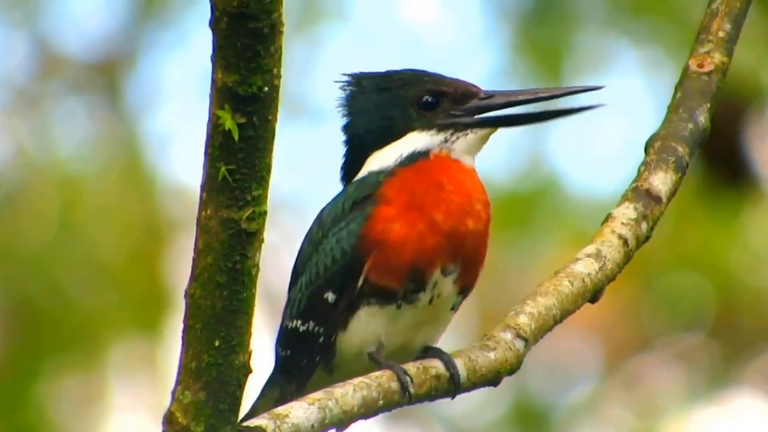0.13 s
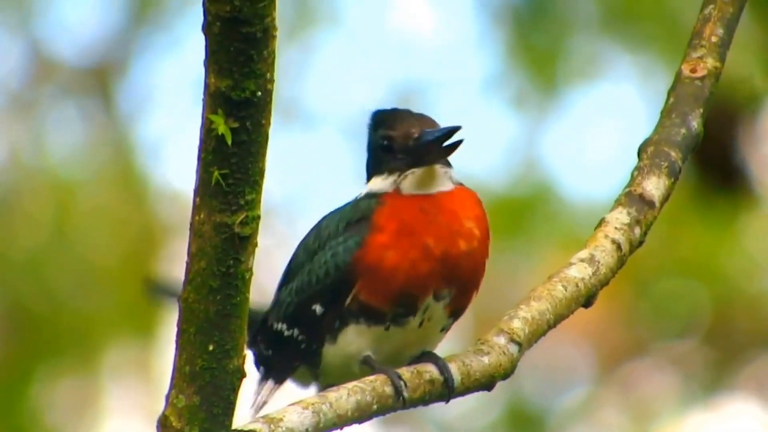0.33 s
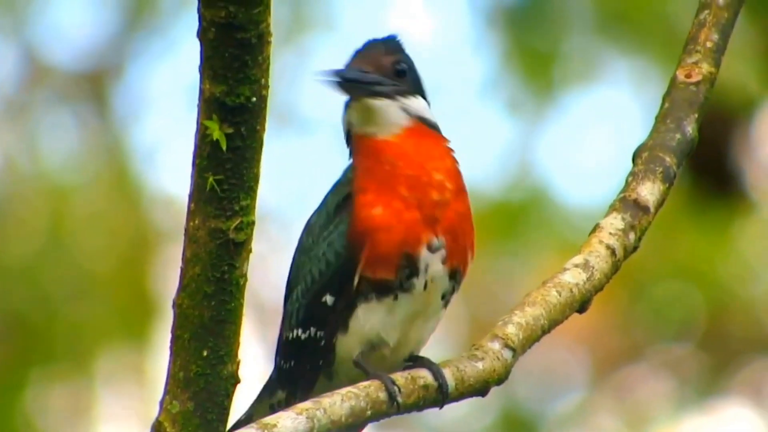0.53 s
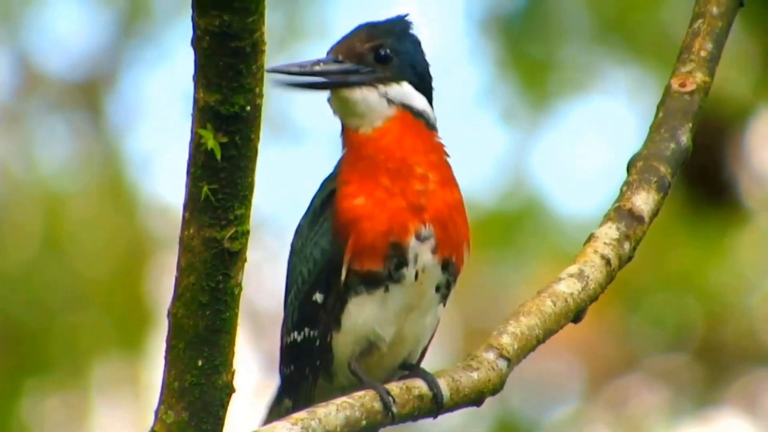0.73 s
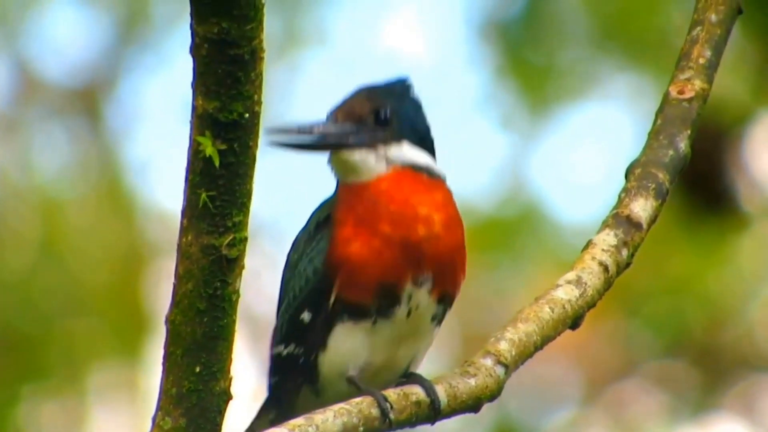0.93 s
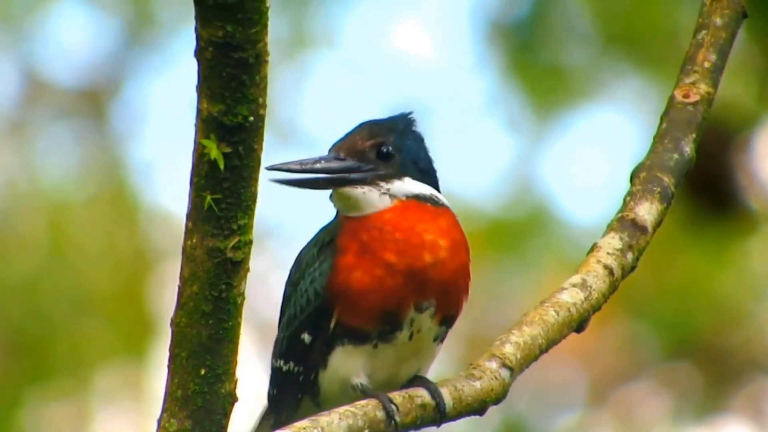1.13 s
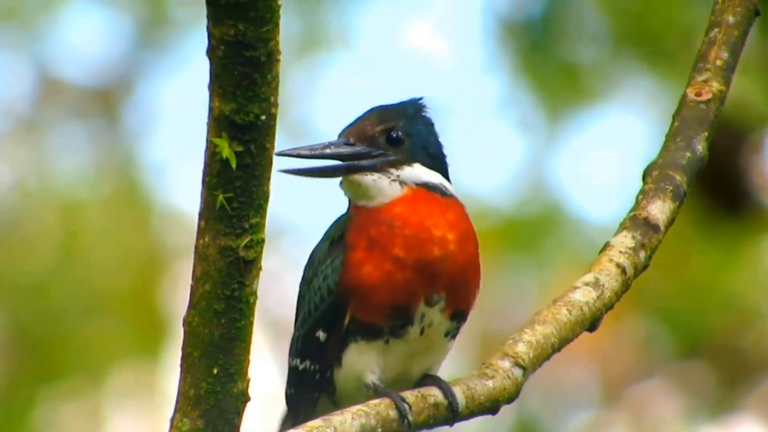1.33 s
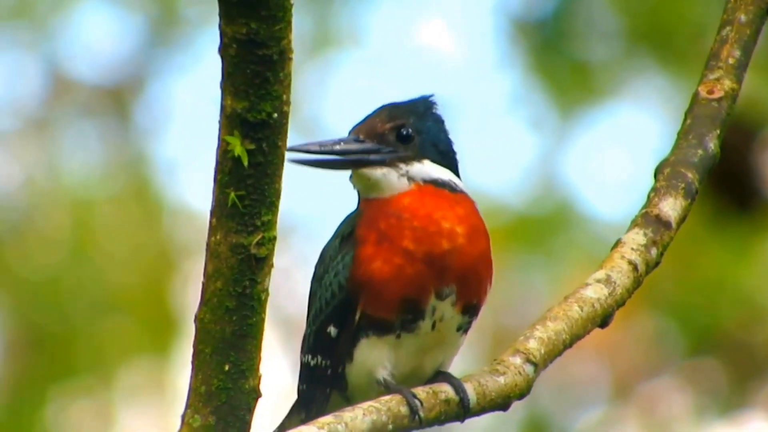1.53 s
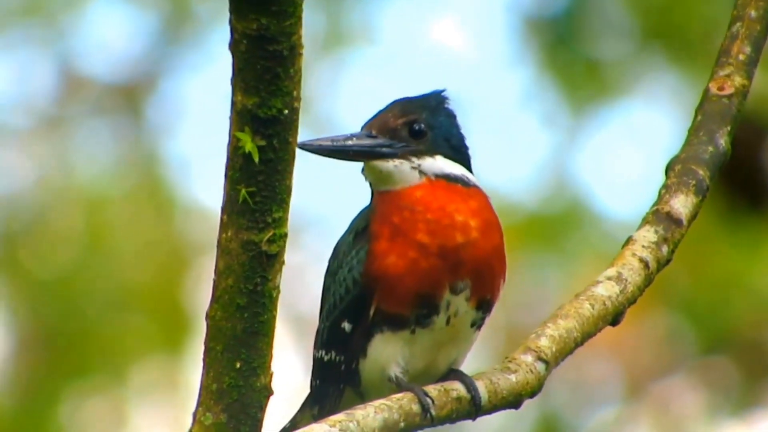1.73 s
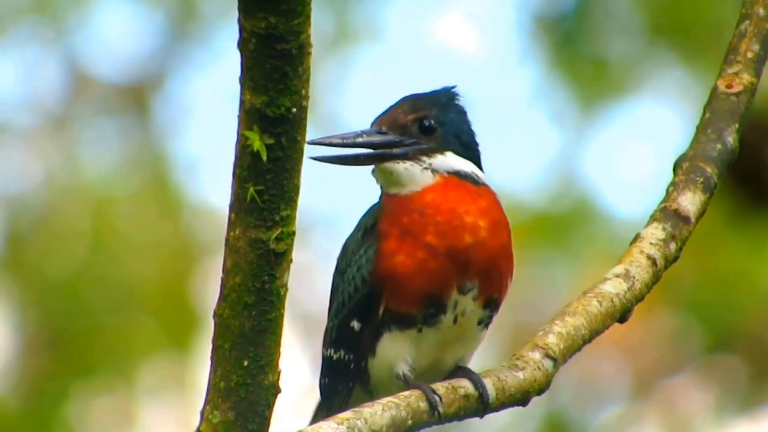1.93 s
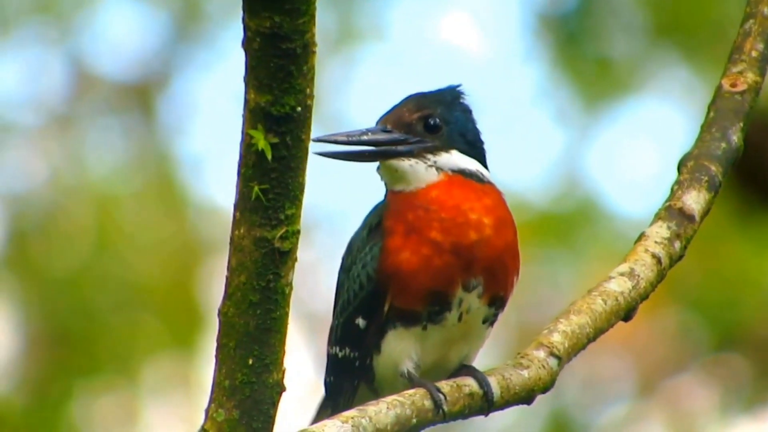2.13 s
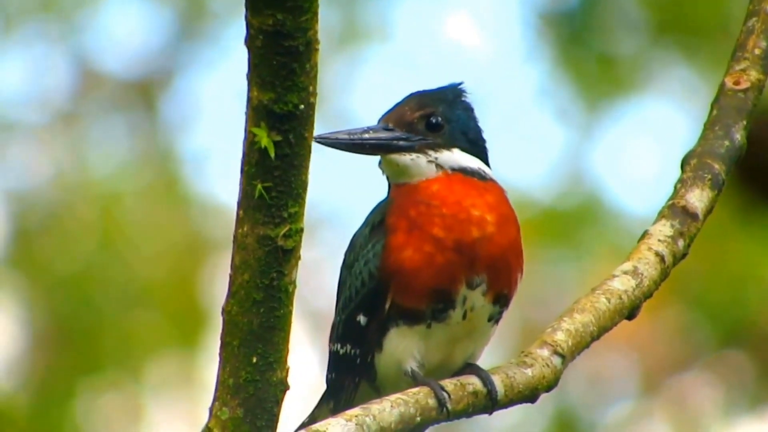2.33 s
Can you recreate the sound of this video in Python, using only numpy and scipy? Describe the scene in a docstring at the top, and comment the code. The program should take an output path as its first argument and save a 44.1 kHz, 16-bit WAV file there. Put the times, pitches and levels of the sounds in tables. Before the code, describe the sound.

Short buzzy clicking calls from a perched kingfisher, echoing among trees with fainter birds chirping behind

```python
"""Ticking kingfisher in a forest

A small kingfisher on a branch gives dry ticking notes in groups: falling sweeps into a buzz of beating lines
and pulsed noise. Other birds, further off, are wavering sines that whistle, chirp and trill; soft hoots, thumps
and chatter are swells of narrow noise. Decaying noise tails make the echoes from the forest. Low rumble, insects
and a high hiss are filtered noise; the sound fades in fast and sinks at the end.
"""
import sys
import numpy as np
from scipy import signal
from scipy.fft import rfft, irfft
from scipy.io import wavfile
from scipy.ndimage import uniform_filter1d

SR = 44100
rng = np.random.default_rng(int(sys.argv[2]) if len(sys.argv) > 2 else 0)


def file_out(sig):
    """Save sig as 16-bit WAV at sys.argv[1]."""
    # one column per channel
    cols = np.atleast_2d(sig).T
    # limit, then scale
    lim = np.clip(cols, -1, 1)
    pcm = np.round(lim * 32767).astype(np.int16)
    wavfile.write(sys.argv[1], SR, pcm)


N = 110250  # samples, 2.5 s


def amp(db):
    """Decibels to amplitude ratio: 20 dB is a factor of ten."""
    return 10 ** (np.asarray(db) / 20)


def evened(x):
    """Normalization to unit root-mean-square."""
    return x / np.sqrt(np.mean(x ** 2) + 1e-20)


def steady(x):
    """Automatic gain: division by the running RMS of the pair evens out slow level drift."""
    power = uniform_filter1d((x ** 2).mean(0), size=4000)
    return x / np.sqrt(abs(power) + .01)


def read(points, hz):
    """Spectral curve: interpolation between points along logarithmic frequency."""
    f, value = np.transpose(points)
    return np.interp(np.log(hz + 1), np.log(f + 1), value)


def along(points):
    """Envelope: linear interpolation between points in time."""
    s, value = np.transpose(points)
    return np.interp(np.arange(N) / SR, s, value)


def add(mix, s, sound):
    """Superposition: adds a sound to the mix from time s on."""
    part = mix[round(s * SR):][:len(sound)]
    part += sound[:len(part)]


def band(hz, width_hz):
    """Resonance-like spectrum: a rounded peak around hz, width_hz wide between its -3 dB points."""
    top = hz + 2 * width_hz
    below = [(max(hz - 2 * width_hz, 5), -40), (hz - width_hz / 2, -3)]
    above = [(hz + width_hz / 2, -3), (top, -40), (2 * top, -100)]
    return below + [(hz, 0)] + above


def noise(spectrum, patchy_db, size):
    """Short-time synthesis: random spectra with drifting patches give partly correlated stereo noise."""
    # Each row: frequency in Hz, left-right likeness from 0 to 1.
    likeness = [(25, 1), (60, 0.99), (125, 0.34), (250, 0.59), (500, 1), (1000, 0.54), (3000, 0.069),
                (6000, 0.79), (12000, 0.22)]
    frames, hz = 4 * N // size + 5, np.fft.rfftfreq(size, 1 / SR)
    a, b, c, d, patches = rng.standard_normal((frames, len(hz), 5)).T
    patches = uniform_filter1d(patches, size=5, axis=0)
    patches = evened(uniform_filter1d(patches, size=8, axis=1))
    same = np.clip(read(likeness, hz), 0, 1)[:, None]
    left = a + 1j * b
    right = same * left + np.sqrt(1 - same ** 2) * (c + 1j * d)
    outside = (hz < spectrum[0][0]) | (hz > spectrum[-1][0])
    db = np.where(outside, -90, read(spectrum, hz))
    z = np.array([left, right]) * amp(db[:, None] + patchy_db * patches)
    return evened(signal.istft(z, nperseg=size, noverlap=3 * size // 4)[1][:, :N])


def rumble():
    """Amplitude modulation: two low noise bands, levelled and then swelling on their own paths."""
    # Each row: frequency in Hz, relative level in dB.
    rumble_spectrum = [(26, -59), (45, -6), (65, 2.5), (81, 9), (108, -13), (135, -4), (170, -67),
                       (220, -77), (370, -120)]
    # Each row: time in seconds, level in dB; the first for the rumble, the second for the deepest band.
    rumble_level = [(0.06, -73), (0.17, -59.5), (0.2, -70), (0.31, -55), (0.57, -68), (0.78, -49.5),
                    (1.06, -66.5), (1.12, -58), (1.2, -51), (1.67, -67.5), (1.72, -53), (1.78, -47),
                    (1.94, -69), (1.99, -57.5), (2.12, -66.5), (2.18, -40.5), (2.26, -57.5), (2.45, -52)]
    deep_level = [(.06, -61), (.3, -73), (.55, -70), (.6, -51.5), (.75, -67), (1.05, -69), (1.15, -56.5),
                  (1.4, -71), (1.56, -56.5), (1.7, -79), (2.0, -66), (2.45, -68)]
    deep = amp(along(deep_level)) * steady(noise(band(27.7, 24), patchy_db=6.5, size=8192))
    level_db = uniform_filter1d(along(rumble_level), size=800)
    return deep + amp(level_db) * steady(noise(rumble_spectrum, patchy_db=1.0, size=8192))


def wash():
    """Spectral shaping: broad patchy noise whose part below a cutoff swells by itself."""
    # Each row: frequency in Hz, relative level in dB.
    air_spectrum = [(88, -14.5), (150, -7.5), (309, -9.5), (624, -12.5), (726, -17), (783, -7.5),
                    (1210, -19), (1330, -17.5), (1880, -29), (2910, -17.5), (3380, -18.5), (5540, -21.5),
                    (7000, -19), (8910, -27), (12500, -52.5), (14100, -132)]
    # Each row: time in seconds, gain of the lower part in dB.
    low_swell = [(.06, 4.5), (.3, 0.5), (.5, 5), (.8, 1.5), (1.1, 3.5), (1.3, 4.5), (1.7, 6), (2., 3),
                 (2.25, 5), (2.45, 12)]
    level_db, cutoff_hz = -61.5, 1760
    air = amp(level_db) * noise(air_spectrum, patchy_db=5.0, size=1024)
    low = signal.sosfiltfilt(signal.butter(4, cutoff_hz, fs=SR, output="sos"), air)
    return air + (amp(along(low_swell)) - 1) * low


def insects():
    """Band-limited noise: a treble band that follows a slow level path."""
    # Each row: time in seconds, level in dB.
    insect_level = [(.06, -58.5), (.2, -64), (.6, -60.5), (.75, -57.5), (1.1, -55), (1.5, -55), (1.85, -62),
                    (2.2, -69), (2.4, -75)]
    centre_hz, width_hz = 6530, 1500
    return amp(along(insect_level)) * noise(band(centre_hz, width_hz), patchy_db=4.5, size=512)


def top_hiss():
    """Band-limited noise: the top treble comes and goes."""
    # Each row: time in seconds, level in dB.
    hiss_level = [(.06, -99), (.77, -102), (.81, -61), (.9, -76), (.93, -54.5), (1.05, -81), (1.2, -102),
                  (1.62, -103), (1.85, -77), (2.2, -79), (2.26, -87)]
    return amp(along(hiss_level)) * noise(band(12200, 1800), patchy_db=3.2, size=1024)


def puff(length, hz, width_hz, db):
    """Windowed narrow-band noise: one half-sine swell."""
    f, t = np.fft.rfftfreq(8192, 1 / SR), np.arange(0, length, 1 / SR)
    hiss = evened(irfft(rfft(rng.standard_normal(8192)) * amp(read(band(hz, width_hz), f))))
    return amp(db) * np.sin(np.pi * t / length) * evened(np.resize(hiss, len(t)))


def puffs(mix):
    """Narrow-band noise bursts: soft breathy bands, low hoots, thumps and far chatter."""
    # One start in seconds for each row of the next table.
    starts = [.12, .2, .3, .4, 2.35, .72, .715, 1.65, 1.64, 1.4, 1.17, .04, .35, .46, .56, .585, .615, .77,
              2.16]
    # Each row: length in seconds, centre in Hz, width in Hz, relative level in dB.
    puff_bands = [(0.036, 328, 91, -57), (0.056, 327, 48, -55), (0.054, 367, 83, -53),
                  (0.15, 319.5, 42, -53.5), (0.063, 277, 4.4, -46.5), (0.068, 550, 390, -70),
                  (0.018, 633, 280, -46.5), (0.051, 965, 100, -56), (0.056, 1250, 74, -56),
                  (0.47, 276, 120, -64), (0.17, 1424, 130, -57.5), (0.051, 8060, 570, -59),
                  (.06, 2020, 510, -64), (0.023, 1910, 250, -57), (0.025, 3660, 870, -54),
                  (0.011, 1940, 290, -55), (0.02, 2760, 1450, -53), (0.054, 3180, 210, -58),
                  (0.028, 64, 13, -50.5)]
    for s, row in zip(starts, puff_bands):
        add(mix, s, puff(*row))


def whistle(mix, points, waver_share=.004):
    """Frequency modulation: a sine on a path wavers and flutters on its way through the leaves."""
    edge_s, flutter_db = 0.0029, 2.5
    s, hz, db = np.transpose(points)
    t = np.arange(s[0], s[-1], 1 / SR)
    waver = evened(uniform_filter1d(rng.standard_normal(len(t)), size=90))
    flutter = evened(uniform_filter1d(rng.standard_normal(len(t)), size=260))
    edges = np.clip(np.minimum(t - s[0], s[-1] - t) / edge_s, 0, 1)
    # Phase in turns is the running sum of frequency.
    turns = np.cumsum(np.interp(t, s, hz) * (1 + waver_share * waver)) / SR
    level = amp(np.interp(t, s, db) + flutter_db * flutter)
    add(mix, s[0], edges * level * np.sin(2 * np.pi * turns))


def far_whistles(mix):
    """Gliding tones: whistles and chirps of far birds bend from point to point."""
    # One list per whistle. Each row: time in seconds, frequency in Hz, relative level in dB.
    whistle_paths = [
        [(.065, 7680, -51), (.08, 7400, -44.5), (.1, 7650, -68)],
        [(.67, 4400, -56), (.68, 4400, -50), (.688, 4400, -54)],
        [(.716, 5840, -60), (.723, 6050, -47.5), (.738, 5350, -46), (.75, 4450, -38), (.758, 4270, -33.5),
         (.767, 5050, -46)],
        [(.772, 4400, -48), (.787, 4250, -41), (.797, 4050, -48)],
        [(.855, 6000, -50), (.867, 5850, -44), (.878, 5150, -45), (.89, 4200, -43), (.9, 3550, -52)],
        [(.99, 1815, -52), (1.025, 1883, -51), (1.05, 2395, -43.5), (1.065, 2730, -42.5), (1.08, 3100, -41.5),
         (1.1, 2857, -42), (1.12, 3000, -54)],
        [(1.128, 3900, -37.5), (1.134, 4830, -32)],
        [(1.133, 3460, -22), (1.137, 3840, -42), (1.142, 4900, -34)],
        [(1.143, 2930, -35), (1.15, 2564, -39), (1.158, 1770, -63), (1.165, 1750, -52.5), (1.172, 1838, -37.5),
         (1.179, 1760, -41)],
        [(1.182, 2836, -37), (1.19, 2186, -48), (1.2, 1500, -37)],
        [(1.232, 3360, -36.5), (1.24, 3590, -34)],
        [(1.243, 2960, -32), (1.256, 2260, -45.5)],
        [(1.265, 1870, -47.5), (1.28, 2042, -36.5)],
        [(1.281, 2480, -42), (1.296, 1570, -44)],
        [(1.33, 3430, -39), (1.342, 4200, -41)],
        [(1.365, 1724, -40.5), (1.374, 1810, -45.5), (1.381, 2290, -42), (1.39, 1880, -47.5)],
        [(1.43, 3830, -39), (1.454, 3610, -27.5), (1.459, 3260, -38.5), (1.467, 2940, -47)],
        [(1.485, 3150, -49), (1.515, 2889, -34), (1.545, 2520, -41.5), (1.575, 2270, -46), (1.6, 2260, -46.5),
         (1.617, 2340, -48)],
    ]
    for points in whistle_paths:
        whistle(mix, points)


def tick(level_db, treble_db, low_db, hold_s):
    """Beating and pulsed noise: a falling sweep leads into close lines and a rasp that die exponentially."""
    # Each row: mean frequency in Hz, mean relative level in dB.
    buzz_lines = [(3620, -12.5), (4508, -4), (4883, -3), (5220, -7), (5678, -23), (6085, -7.5),
                  (6800, -19.5), (7320, -16.5)]
    # Each row: frequency in Hz, relative level in dB.
    rasp_spectrum = [(710, -50), (1200, -49), (2620, -19), (3120, -22), (3640, -12.5), (3950, -7.5),
                     (4660, 1.5), (6820, -3), (8200, -32.5), (10400, -28), (14000, -58)]
    rise_s, t60_s = 0.0017, 0.033
    lines_db, rasp_db, chirp_db = -11.5, -10.5, -4
    pulse_hz, pulse_depth = 342.5, .6
    # Full spread of pitch (as a share), level (dB) and phase (radians / 2 pi) from tick to tick.
    pitch_spread, level_spread_db, phase_spread = .01, 6, 0.38
    treble_hz, low_hz = 8650, 3550  # the treble gain acts above, the low gain below
    chirp_s, chirp_from_hz, chirp_to_hz = 0.0033, 6204, 4122

    t = np.arange(2048) / SR
    hz = np.fft.rfftfreq(len(t), 1 / SR)
    shape = np.clip(t / rise_s, 0, 1) * amp(-60 * np.maximum(t - hold_s, 0) / t60_s)
    lines = np.zeros(len(t))
    for f, db in buzz_lines:
        u, v, w = rng.random(3)
        line_hz = f * (1 + pitch_spread * (w - .5))
        line_level = amp(db + level_spread_db * (u - .5))
        lines += line_level * np.sin(2 * np.pi * (line_hz * t + phase_spread * v))
    rasp = evened(irfft(rfft(rng.standard_normal(len(t))) * amp(read(rasp_spectrum, hz))))
    pulses = 1 + pulse_depth * np.sin(2 * np.pi * pulse_hz * t)
    buzz = amp(lines_db) * evened(lines) + amp(rasp_db) * pulses * rasp
    colour = amp(treble_db * (hz > treble_hz) + low_db * (hz < low_hz))

    part = np.clip(t / chirp_s, 0, 1)
    sweep_hz = chirp_to_hz + (chirp_from_hz - chirp_to_hz) * (1 - part) ** 2
    chirp = amp(chirp_db) * np.sin(np.pi * part) * np.sin(2 * np.pi * np.cumsum(sweep_hz) / SR)
    return amp(level_db) * (chirp + shape * irfft(rfft(buzz) * colour))


def kingfisher(mix):
    """Impulsive calls: groups of ticks, each with its own colour and length."""
    # Each row: time in seconds, relative level in dB, treble gain in dB, low gain in dB,
    # hold before the decay in seconds.
    tick_notes = [(0.2122, -30, 15.5, -5, 0.0042), (0.3434, -30, 15, 7.5, 0.011),
                  (0.4378, -30.5, 7, 9, 0.0088), (0.519, -31, 6.5, 13, 0.0064),
                  (0.8037, -30, 7.5, 11.5, 0.0083), (0.9152, -24.5, 12, 12.5, 0.006),
                  (1.2286, -29, 11.5, 12, 0.0062), (1.3412, -25, 13, 13, 0.0077),
                  (1.426, -29.5, 12, 7, 0.0092), (1.5074, -28, 10.5, 4, 0.0044),
                  (1.8594, -29, 12, 9, 0.0084), (1.9819, -28.5, 10.5, 6, 0.0076),
                  (2.1, -29, 9.5, 8, 0.0064), (2.1864, -31, 8, 9, 0.0069)]
    lead_s = 0.00101  # the sweep starts just ahead of the listed time
    for s, *voice in tick_notes:
        add(mix, s - lead_s, tick(*voice))


def high_tones(mix):
    """Random frequency modulation: a stronger waver makes a high falling whistle and two thin, fading tones fuzzy."""
    # One list per tone. Each row: time in seconds, frequency in Hz, relative level in dB.
    tone_paths = [
        [(.915, 8470, -48.5), (.95, 8365, -52), (.99, 7610, -51), (1.04, 7570, -63)],
        [(2.212, 7000, -53), (2.3, 7000, -58), (2.4, 7000, -68)],
        [(2.212, 8950, -54), (2.3, 8850, -59), (2.4, 8900, -69)],
    ]
    for points in tone_paths:
        whistle(mix, points, waver_share=.013)


def trill(mix):
    """Repeated rising glides: each note has a softer, higher second stroke."""
    # Each row: start in seconds, middle frequency in Hz, relative level in dB.
    trill_notes = [(1.495, 6200, -53.5), (1.533, 6360, -44.5), (1.566, 6490, -41.5), (1.6, 6460, -43),
                   (1.636, 6450, -41.5), (1.675, 6480, -44.5), (1.714, 6510, -44), (1.757, 6240, -47.5),
                   (1.804, 6190, -45.5)]
    stroke_s, rise = 0.013, 0.028  # rise: share of pitch below the middle at the start, above it at the end
    strokes = [(0, 1, 0), (.017, 1.035, -6)]  # delay in seconds, pitch ratio, level change in dB
    for s, hz, db in trill_notes:
        for late, up, change_db in strokes:
            start = (s + late, hz * up * (1 - rise), db + change_db)
            end = (s + late + stroke_s, hz * up * (1 + rise), db + change_db)
            whistle(mix, [start, end])


def echoes(x, t60s):
    """Reverberation: a noise tail gives dense scattered returns, each band dying at its own speed."""
    # Each row: frequency in Hz, left-right likeness of the echoes from 0 to 1.
    echo_likeness = [(2000, 0.47), (4000, 0.73), (8000, 0.53), (12000, 0.2)]
    delay_s, rise_s = .004, 0.0013
    hz, t, z = signal.stft(rng.standard_normal((2, SR)), SR, nperseg=128)
    same = np.clip(read(echo_likeness, hz), 0, 1)[:, None]
    z = np.array([z[0], same * z[0] + np.sqrt(1 - same ** 2) * z[1]])
    decay = amp(-60 * t / read(t60s, hz)[:, None])
    tail = signal.istft(z * decay, SR, nperseg=128)[1]
    tail = tail * np.clip((np.arange(tail.shape[1]) / SR - delay_s) / rise_s, 0, 1)
    return signal.fftconvolve(x[None], tail / np.linalg.norm(tail[0]), axes=1)[:, :N]


def scene():
    """Superposition: direct sound, a short and a long reverberation, and the background."""
    # Each row: frequency in Hz, time in seconds to decay by 60 dB.
    forest_t60 = [(1500, 0.73), (4000, 0.52), (8000, 0.49), (12000, 0.55)]
    close_t60 = [(1000, .11), (9000, .11)]
    near, far = np.zeros(N), np.zeros(N)
    background = rumble() + wash() + insects() + top_hiss()
    puffs(far)
    far_whistles(far)
    kingfisher(near)
    high_tones(far)
    trill(far)
    direct = near + amp(-1) * far
    close = echoes(amp(-11) * near + amp(-8) * far, close_t60)
    forest = echoes(amp(-0.5) * near + amp(-2.9) * far, forest_t60)
    return direct + close + forest + background


def record(dry):
    """Interchannel level and phase differences: an uneven microphone pair, then fades and a band limit."""
    # Each row: frequency in Hz, left minus right level in dB.
    level_tilt = [(25, 8), (125, 2.5), (250, 10), (500, -2.7), (1000, 1.5), (12000, 2)]
    # Each row: frequency in Hz, phase lead of the left in radians.
    phase_lead = [(25, -0.4), (60, 0.34), (125, 0.2), (300, 4.5), (500, 2.5), (900, 2.5), (1500, 2),
                  (2500, -0.0556), (12000, 1.5)]
    # Each row: time in seconds, gain in dB.
    fade = [(0, -72), (.035, -35), (.045, -7), (.1, -3), (.2, 0), (2.25, 1), (2.4, -5.5), (2.5, -12)]
    cutoff_hz = 14200
    hz = np.fft.rfftfreq(N, 1 / SR)
    # Each side takes half of the difference.
    lean = amp(read(level_tilt, hz) / 2) * np.exp(.5j * read(phase_lead, hz))
    pair = irfft(rfft(dry) * np.array([lean, 1 / lean]), N) * amp(along(fade))
    low_pass = signal.firwin(511, cutoff_hz, window=("kaiser", 9), fs=SR)
    return signal.oaconvolve(pair, low_pass[None], "same")


dry = scene()
out = record(dry)
file_out(out)
```